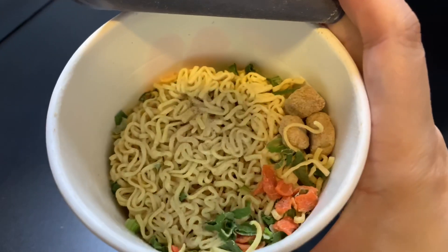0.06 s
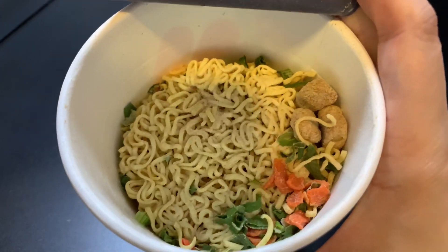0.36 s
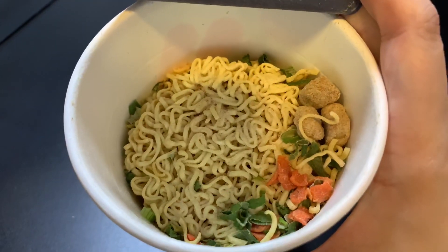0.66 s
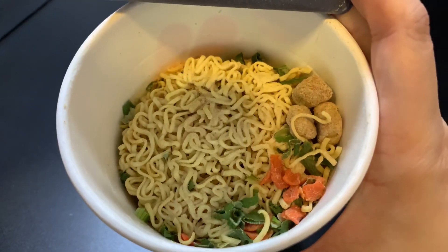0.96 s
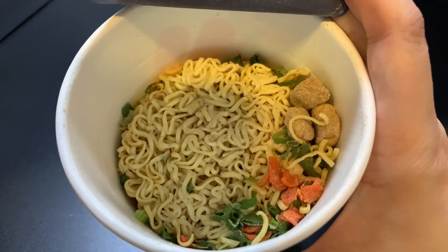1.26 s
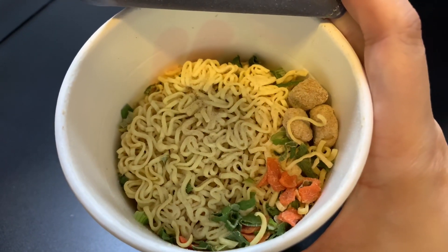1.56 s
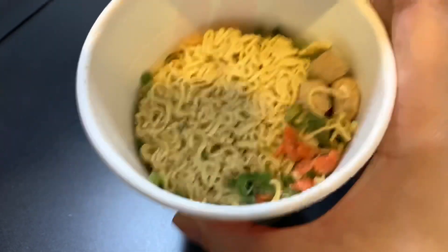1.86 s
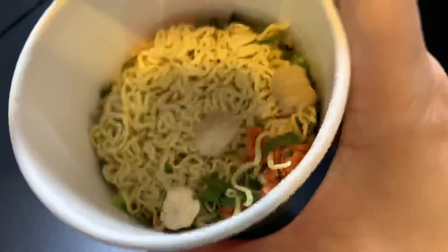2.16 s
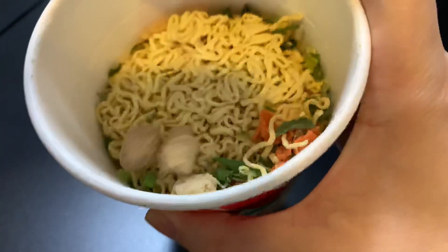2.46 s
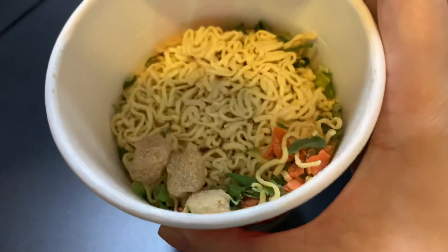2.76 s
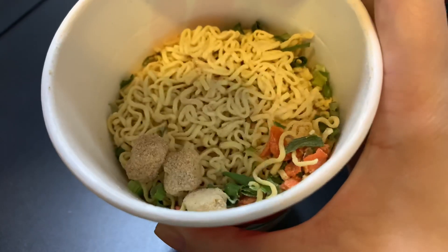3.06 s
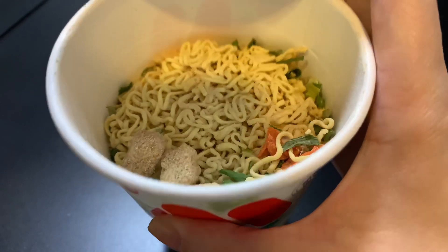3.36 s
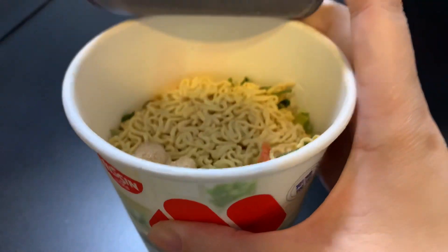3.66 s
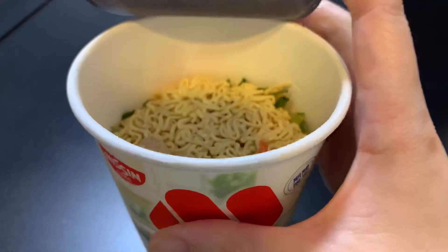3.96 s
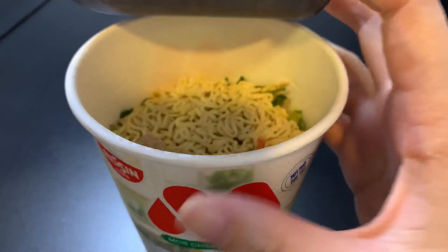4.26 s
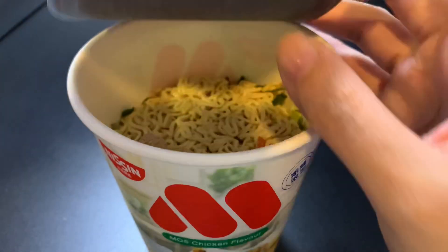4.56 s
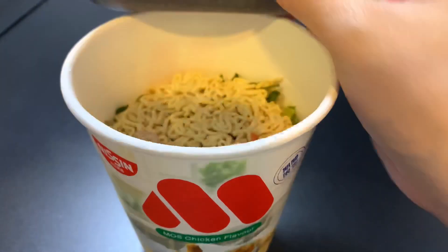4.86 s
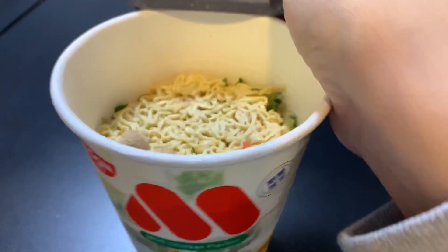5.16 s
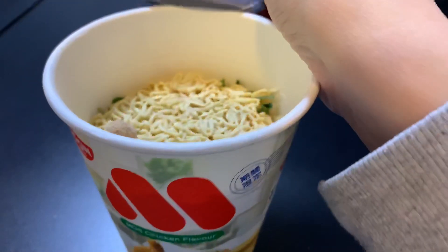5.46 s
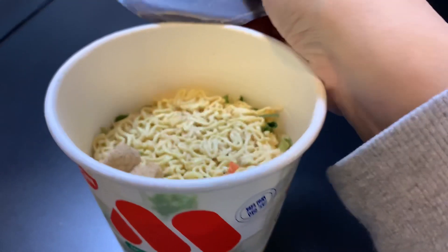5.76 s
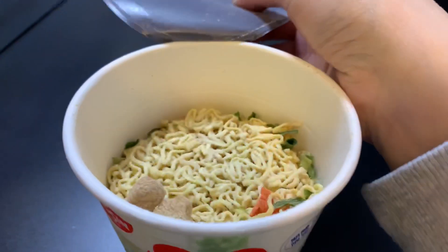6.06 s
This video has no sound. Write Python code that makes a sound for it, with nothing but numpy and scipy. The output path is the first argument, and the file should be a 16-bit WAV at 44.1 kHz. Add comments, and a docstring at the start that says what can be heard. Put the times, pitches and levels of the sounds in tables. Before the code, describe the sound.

Over a faint, low ventilation rumble in a small room, dry noodle pieces briefly crunch and patter inside a shaken paper cup, close to the microphone. Two hollow thumps follow about a second apart as the cup meets a table, with soft fingertip bumps and skin brushing the paper around them. Finally fingers bend back the foil lid, giving a light hiss, a sharp crack and then a quieter, duller snap.

```python
"""A small quiet room, close to a paper cup of dry instant noodles being handled.
One shake sends the pieces sliding and tumbling: they crunch along the paper and ring the hollow cup.
The cup thumps down on the table and is knocked again as the grip changes. Skin sticks and slips
on the paper, then fingers bend back the foil lid, which buckles in two snaps, one bright, one dull.
A low ventilation rumble lies underneath."""
import sys
import numpy as np
from scipy import signal
from scipy.fft import rfft, irfft, next_fast_len
from scipy.io import wavfile

SR = 44100
rng = np.random.default_rng(int(sys.argv[2]) if len(sys.argv) > 2 else 0)


def bounce(signal):
    """Save signal as a 16-bit WAV file at the path given by the first command-line argument."""
    frames = np.transpose(np.atleast_2d(signal))
    limited = np.clip(frames, -1, 1)
    pcm = np.round(limited * 32767).astype(np.int16)
    wavfile.write(sys.argv[1], SR, pcm)


N = 273861
TIME = np.arange(N) / SR
HIT_TIME = TIME[:SR // 3]

# Cues. Their levels are fader settings, ahead of each layer's trim and filters.
# loose pieces sliding: full_at_s, hold_s, level_db, fade_db_per_s
NOODLE_SLIDES = [(1.743, 0.0048, -52.5, 447), (1.811, 0.045, -69, 402), (1.863, 0.026, -51, 502),
                 (1.919, 0.051, -43, 230), (1.964, 0.014, -52.5, 900), (2.018, 0.029, -57, 100),
                 (2.205, 0.07, -64.5, 87), (2.261, 0.056, -65.5, 400)]
# big pieces dropping on the noodle block: start_s, level_db, pitch_hz, brightness_hz
PIECE_DROPS = [(1.741, -38, 691, 1490), (1.868, -32, 590, 900), (1.884, -30.5, 620, 900),
               (1.916, -38, 634, 1500), (1.933, -33, 535, 800), (1.965, -30.5, 610, 1200),
               (2.032, -36, 580, 1300), (2.044, -39.5, 600, 1200), (2.056, -38, 590, 704),
               (2.131, -43, 503, 706), (2.163, -42, 583, 890), (2.235, -38.5, 620, 700),
               (2.248, -44.5, 644, 1500), (2.26, -39.5, 600, 2500), (2.301, -52, 590, 700),
               (2.329, -44.5, 584, 900), (2.366, -57, 600, 900), (2.421, -54, 600, 2500),
               (2.472, -53, 610, 600)]
# sharp contacts on the wall and rim: start_s, click_db, wall_ring_db, click_t60_s
WALL_TICKS = [(1.745, -62, -45, 0.02), (1.849, -56, -53, 0.018), (1.9206, -46, -40.5, .02),
              (1.9666, -38.5, -40, 0.038), (2.095, -37.5, -70, 0.014), (2.126, -38.5, -49.5, 0.02),
              (2.159, -53, -63, .03), (2.1787, -38.5, -38.5, 0.01), (2.21, -60, -60, .012),
              (2.238, -62, -48, 0.012), (2.2584, -62, -47.5, .01), (2.285, -43, -58, 0.027),
              (2.2925, -42, -70, 0.016), (2.303, -51, -60, .025), (2.3223, -38, -45, 0.0099),
              (2.33, -39, -43.5, 0.012), (2.36, -44, -60, 0.012), (2.3635, -40, -56, 0.022),
              (2.386, -57, -68, 0.011), (2.4218, -61, -58, 0.0092), (2.4433, -57.5, -70, 0.012),
              (2.4703, -56.5, -70, 0.017), (2.5065, -48, -70, 0.019), (2.543, -63, -73, 0.011),
              (3.6634, -42.5, -43.5, 0.018), (3.766, -61, -79, 0.0086), (3.8131, -45.5, -75, 0.0085),
              (4.514, -38.5, -44.5, 0.014), (4.588, -32.5, -39, 0.011)]
# the base meets the table, then rocks to rest: start_s, level_db, brightness_hz, low_cut_hz
TABLE_KNOCKS = [(3.6619, -23, 840, 70), (3.685, -41, 380, 200), (3.695, -44.5, 280, 90),
                (3.714, -49, 700, 300), (4.587, -20.5, 600, 300), (4.596, -34, 220, 70.4),
                (4.6032, -30.5, 397, 260), (4.618, -41.5, 330, 220), (4.634, -41.5, 350, 240)]
# the foil buckling: start_s, foil_db, brightness_hz, step_gap_s, rim_db
LID_SNAPS = [(5.6364, -13, 10600, 0.0012, -34.5), (6.0938, -38, 2200, 0.002545, -31.5)]
# fingers sliding along the lid: full_at_s, hold_s, level_db
LID_STROKES = [(5.581, 0.073, -56.5), (5.762, 0.14, -58.5), (5.806, 0.066, -68.5), (6.059, 0.018, -69.5),
               (6.179, 0.15, -69)]
# fingertips landing on the cup: start_s, flex_db, pitch_hz, hollow_db
FINGER_BUMPS = [(3.632, -43, 514, -41.5), (3.925, -49, 390, -49.5), (3.96, -46.5, 105.6, -49.5),
                (4.059, -53, 264, -61), (4.097, -46.5, 242, -62), (4.144, -51, 320, -67),
                (4.158, -40, 307, -56), (4.198, -47.5, 356, -61), (4.211, -53, 463, -48.5),
                (4.222, -47, 200, -50), (4.407, -47, 196, -54), (4.519, -39, 302, -38),
                (4.564, -44, 353, -45), (4.668, -29.5, 505, -47), (4.74, -58, 395, -51),
                (4.773, -52, 230, -47.5), (4.783, -53, 303, -46.5), (4.853, -51, 302, -52),
                (4.869, -47.5, 196, -48), (4.996, -38.5, 186, -50.5), (5.072, -52, 118, -63),
                (5.139, -57.5, 383, -50), (5.208, -51, 450, -49.5), (5.219, -52.5, 450, -59)]
# skin brushing paper: full_at_s, hold_s, hiss_db, fizz_db, snatch_factor (higher is more sudden)
FINGER_STROKES = [(3.298, 0.023, -72.5, -70.5, 0.52), (3.484, 0.048, -76.5, -77, 0.92),
                  (3.655, 0.074, -65.5, -67.5, 0.62), (3.813, 0.053, -70.5, -68, 1.4),
                  (4.182, 0.12, -68, -65.5, 1.1), (4.314, 0.028, -58, -49, 1.1),
                  (4.51, 0.12, -58, -60.5, 0.96), (4.768, 0.021, -61.5, -67, 0.71),
                  (4.855, 0.033, -63, -62, 1.2), (4.998, 0.19, -66, -63.5, 1.5),
                  (5.087, 0.049, -69, -60, 1), (5.356, 0.11, -67.5, -72, 0.71)]
# the palm dragging as the grip shifts: full_at_s, hold_s, level_db
PALM_DRAGS = [(3.944, 0.038, -56), (4.052, 0.026, -58.5), (4.14, 0.08, -58.5), (4.426, 0.071, -62),
              (4.7, 0.12, -62), (5.048, 0.26, -66.5)]

# resonances of the cup's parts: pitch_hz, level_db, t60_s
HELD_CUP_MODES = [(430, -6.5, 0.022), (514, 2, 0.024), (600, 1.5, 0.034), (782, -3, 0.034),
                  (836, 3, 0.0097), (1292, -12, 0.049)]
STANDING_CUP_MODES = [(72, -9.5, 0.15), (101, -12, 0.13), (147.5, -3.5, 0.053), (254, -2.5, 0.06),
                      (327, -2.5, 0.046), (425, 2.5, 0.029), (563, 6.5, 0.026), (610, 1.5, 0.023),
                      (740, -15.5, 0.022), (1116, -8.5, 0.03), (1300, -7, 0.02), (1386, -2.5, 0.05)]
WALL_MODES = [(1167, 13.5, 0.008), (1353, -3, 0.022), (1530, 0, 0.015), (2050, -8.5, 0.049),
              (2460, -3.5, 0.013), (3037, -7.5, 0.044)]
LID_MODES = [(173, -15, 0.03), (323, -2, 0.028), (450, -2, 0.015), (620, -11, 0.02), (1030, -1, 0.0094),
             (1410, 5.5, 0.01), (1615, -4.5, 0.014), (1997, -9.5, 0.13), (2169, -9.5, 0.17),
             (2200, -1.5, 0.01), (2870, 4, 0.018), (3690, 8.5, 0.0023), (4570, -27, 0.0056),
             (6000, -3, 0.005)]
RIM_MODES = [(436, -13, 0.04), (600, -17.5, 0.067), (1130, 6.5, 0.022), (1410, -16, 0.02)]

# tone curves of the noise textures and the reverb: frequency_hz, gain_db
CRUNCH_EQ = [(300, 4), (900, -13), (1400, 3), (1900, 1), (2800, -1), (5000, -4.5), (7200, -6), (9000, -6),
             (10600, -9), (11800, -13.5), (13500, -11), (16000, -15)]
TICK_EQ = [(600, -7), (2000, -7.5), (4000, 0), (7000, 3.5), (9500, 2), (12000, -0.5), (14000, -7),
           (16000, -12.5)]
FOIL_CRACK_EQ = [(300, 2.5), (1300, 11), (3000, 3), (6000, 13), (8000, -0.5), (10500, -17), (16000, -3)]
FOIL_RUB_EQ = [(200, 3.5), (1100, -8.5), (2500, -10.5), (3400, -5), (4250, -1), (5300, -2.5), (7000, -4.5),
               (8500, -5.5), (11500, -17.5), (14000, -21), (16000, -31)]
SKIN_HISS_EQ = [(200, 18.5), (600, -5), (1100, 14), (1800, 7.5), (3000, 10.5), (5000, -1.5), (7000, 5.5),
                (10000, -51), (16000, -41)]
SKIN_FIZZ_EQ = [(1000, -18), (5000, -4.5), (7200, -3.5), (8600, -6.5), (10500, -4.5), (11800, -15),
                (13800, -11.5), (16000, -19.5)]
PALM_EQ = [(50, -6), (110, 3), (300, -2), (600, -11), (800, -21), (1300, -20), (3000, -41.5)]
ROOM_TONE_EQ = [(20, -38.5), (42, -16), (63, 5), (85, -1), (115, -14), (175, -7.5), (250, -19.5),
                (400, -30), (1000, -36), (2500, -44), (6500, -53), (9300, -46), (11800, -57.5),
                (14000, -44.5), (16000, -76)]
REVERB_EQ = [(100, 9.5), (300, 5), (550, 2), (850, 1), (1100, -0.5), (1450, 6), (2100, 3.5), (2900, 1.5),
             (5000, 0.5), (9000, -5.5), (15000, -5)]

# the room's decay: frequency_hz, t60_s
REVERB_DECAY = [(100, 0.45), (300, 0.27), (800, 0.35), (2200, 0.27), (6000, 0.33), (14000, 0.15)]
# power scattered by cup, hand and room: frequency_hz, share_fraction
SCATTER_SHARE = [(150, 0.05), (500, 0.06), (1700, 0.44), (2700, 0.67), (5500, 0.74), (7000, 0.01),
                 (10000, 0.04), (12000, 0)]
# the left microphone port's level over the right: frequency_hz, balance_db
LEFT_BALANCE = [(150, 1), (300, 0.5), (550, 4), (1100, 6.5), (2200, 0.5), (5000, -0.5)]
# the left port's phase lead over the right: frequency_hz, lead_rad
LEFT_LEAD = [(0, 0), (500, 1.3), (1000, 0.87), (1600, 3.5), (2800, 7), (4000, 7), (5500, 9.5), (6200, 11),
             (7200, 10), (9200, 5), (10300, 3.5), (11400, 5), (12200, 4.5), (13300, -0.7), (14700, 1.5),
             (15500, -2.5)]


def noodles():
    """Crumbs scrape along the paper in a dense crunch while bigger pieces drop and sound the cup."""
    flow = sum(from_db(db) * swell(s, hold_s, rise_db_per_s=1502, fade_db_per_s=fade)
               for s, hold_s, db, fade in NOODLE_SLIDES)
    crumbs = grains(per_s=7000, spread_db=2.0)
    edges_hz = np.geomspace(700, 16000, 7)   # each crumb sounds in one of six bands
    crunch = sum(band(part, low, high)
                 for part, low, high in zip(deal(crumbs, count=6), edges_hz, edges_hz[1:]))
    crunch = from_db(1.0) * rms_one(colour(crunch, CRUNCH_EQ))
    tunings = np.exp([-0.15, 0, 0.15])   # the cup's note strays with where a crumb lands
    hollow = sum(resonate(part, retuned(HELD_CUP_MODES, ratio))
                 for part, ratio in zip(deal(crumbs, count=3), tunings))
    out = flow * (crunch + from_db(-4) * cut(rms_one(hollow), 340, "high"))
    for s, db, pitch_hz, brightness_hz in PIECE_DROPS:
        add(out, s, from_db(db) * piece_drop(pitch_hz, brightness_hz))
    return out


def piece_drop(pitch_hz, brightness_hz, usual_pitch_hz=590):
    """A piece lands and rings the held cup; a soft landing leaves out the upper modes."""
    note = ring(retuned(HELD_CUP_MODES, pitch_hz / usual_pitch_hz), vary_db=3.5)
    return peak_one(band(note, 300, brightness_hz))


def wall_ticks():
    """Hard pieces and fingernails click on the paper wall, which rings briefly."""
    out = np.zeros(N)
    for s, click_db, wall_db, t60 in WALL_TICKS:
        wall = from_db(wall_db + 9.0) * peak_one(ring(WALL_MODES, vary_db=3))
        click = from_db(click_db + 8.5) * crack(TICK_EQ, t60)
        add(out, s, click + wall)
    return out


def crumb_trickle(start_s=1.8, end_s=3.1, gap_s=0.035, fade_db_per_s=33):
    """Fine crumbs roll to rest after the shake in uneven, ever fainter clicks."""
    out = np.zeros(N)
    times = start_s + gap_s * (np.arange(40) + rng.uniform(0, .7, 40))
    for s in times[times < end_s]:
        db = -49 - fade_db_per_s * (s - start_s) + 2.0 * rng.normal()
        add(out, s, from_db(db) * crack(TICK_EQ, t60=0.0076))
    return out


def table_knocks():
    """Cup and table thump hollowly, then softer contacts follow as the base rocks to rest."""
    out = np.zeros(N)
    for s, db, brightness_hz, low_cut_hz in TABLE_KNOCKS:
        body = cut(ring(STANDING_CUP_MODES, vary_db=2), brightness_hz)
        thump = peak_one(cut(body, low_cut_hz, "high", order=1))
        add(out, s, from_db(db + 2.5) * thump)
    return out


def foil_lid():
    """Foil hisses under the fingers; each snap is two quick cracks that also tug the cup's rim."""
    snaps = np.zeros(N)
    for s, foil_db, brightness_hz, step_gap_s, rim_db in LID_SNAPS:
        for step_s, step_db in ((s, -4), (s + step_gap_s, 0)):
            foil = peak_one(ring(LID_MODES, vary_db=2.5))
            rim = peak_one(ring(RIM_MODES, vary_db=1.5))
            attack = from_db(4.5) * crack(FOIL_CRACK_EQ, t60=0.0077)
            snap = peak_one(cut(foil + attack, brightness_hz, order=4))
            add(snaps, step_s, from_db(foil_db + step_db) * snap + from_db(rim_db + step_db) * rim)
    speed = sum(from_db(db) * stroke(s, hold_s) for s, hold_s, db in LID_STROKES)
    rub = rms_one(colour(grains(per_s=12000, spread_db=1.5), FOIL_RUB_EQ))
    out = snaps + speed * rub
    add(out, 0.0081, from_db(-14) * band(snaps, 1900, 3600))   # the snaps glance off the table
    return out


def finger_bumps():
    """A soft fingertip flexes the wall, pitched by its spot and grip, and the hollow cup answers."""
    out = np.zeros(N)
    for s, flex_db, hz, hollow_db in FINGER_BUMPS:
        flex_modes = [(hz, 0, 11 / hz), (hz * 1.237, -5, 8 / hz)]   # gone within a few cycles
        flex = peak_one(ring(flex_modes, vary_db=1.5))
        pad_noise = band(rng.standard_normal(len(HIT_TIME)), 0.12 * hz, 0.69 * hz)
        pad = from_db(-7.5) * peak_one(pad_noise * decay(t60=0.054))
        touch = peak_one(cut(flex + pad, 1030, order=4))   # flesh passes no treble
        hollow = peak_one(band(ring(STANDING_CUP_MODES, vary_db=5), 270, 800))
        add(out, s, from_db(flex_db) * touch + from_db(hollow_db) * hollow)
    return out


def finger_brushes():
    """Skin catches and slips on the paper: swells of hiss and fizz over a murmur of the cup."""
    hiss_gain = from_db(-71.5) * stroke(4.49, hold_s=1.17)   # the hand never rests quite still
    fizz_gain = 0
    for s, hold_s, hiss_db, fizz_db, snatch in FINGER_STROKES:
        speed = stroke(s, hold_s, snatch)
        hiss_gain = np.maximum(hiss_gain, from_db(hiss_db) * speed)
        fizz_gain = np.maximum(fizz_gain, from_db(fizz_db) * speed)
    slips = grains(per_s=9000, spread_db=1.0)
    hiss = rms_one(colour(slips, SKIN_HISS_EQ))
    murmur = from_db(-21.5) * resonate(slips, STANDING_CUP_MODES)
    fizz = rms_one(colour(grains(per_s=6000, spread_db=1.5), SKIN_FIZZ_EQ))
    return from_db(4.0) * hiss_gain * (hiss + murmur) + from_db(3.0) * fizz_gain * fizz


def palm_rub():
    """Soft skin sticks and slips on the wall: a dull, uneven rub."""
    speed = sum(from_db(db) * stroke(s, hold_s) for s, hold_s, db in PALM_DRAGS)
    return speed * rms_one(colour(grains(per_s=900, spread_db=2.0), PALM_EQ))


def room_reverb(x, wet_db, predelay_s):
    """Reflections arrive after a short gap and die away, each octave at its own rate."""
    noise = colour(rng.standard_normal(len(HIT_TIME)), REVERB_EQ)
    tail = sum(band(noise, low, 2 * low) * decay(at_hz(REVERB_DECAY, low * np.sqrt(2)))
               for low in 45 * 2. ** np.arange(10))
    since_s = HIT_TIME - predelay_s
    early_lift = 1 + 2.25 * np.exp(-np.abs(since_s) / 0.0089)   # near surfaces answer first
    tail = tail * (since_s > 0) * early_lift
    return from_db(wet_db) * signal.fftconvolve(x, tail / np.sqrt(np.sum(tail ** 2)))[:N]


def room_tone(crossover_hz=610):
    """Ventilation rumble under a faint hiss, from all sides: centred in the bass, wide in the treble."""
    shared, sides = rng.standard_normal(N), rng.standard_normal((2, N))
    bass = cut(shared, crossover_hz, order=1)
    treble = cut(sides, crossover_hz, "high", order=1)
    air = bass + treble + from_db(-10.0) * sides
    return from_db(-59.0) * rms_one(colour(air, ROOM_TONE_EQ))


def mic_ports(x):
    """Two microphone ports hear the same sound, each with its own level and phase."""
    size = next_fast_len(N + SR // 10)
    hz = np.fft.rfftfreq(size, 1 / SR)
    lead_rad = np.interp(hz, *np.transpose(LEFT_LEAD))
    lean = from_db(at_hz(LEFT_BALANCE, hz) / 2) * np.exp(.5j * lead_rad)
    return irfft(rfft(x, size) * np.array([lean, 1 / lean]), size)[:, :N]


def scatter(x, t60, wander_hz):
    """Some sound goes straight to the ports; the rest blurs over short, unsteady stray paths."""
    hz, share = np.transpose(SCATTER_SHARE)
    share = np.clip(share, .001, .95)
    direct = colour(x, np.c_[hz, 10 * np.log10(1 - share)])
    stray = colour(x, np.c_[hz, 10 * np.log10(share)])
    size = next_fast_len(N + SR // 10)
    paths = rfft(rng.standard_normal((2, len(HIT_TIME))) * decay(t60), size)
    stray = irfft(rfft(stray, size) * paths / np.abs(paths), size)   # smears phase, keeps the tone
    wander_rad = np.cumsum(rng.standard_normal((2, N)), axis=1) * np.sqrt(2 * np.pi * wander_hz / SR)
    wobble = np.exp(1j * cut(wander_rad, 2 * wander_hz))
    return mic_ports(direct) + np.real(signal.hilbert(stray)[:, :N] * wobble)


def ring(modes, vary_db):
    """One blow: damped sines of alternating polarity, each at a slightly random strength."""
    return sum((-1) ** k * from_db(db + vary_db * rng.normal()) * decay(t60)
               * np.sin(2 * np.pi * hz * HIT_TIME) for k, (hz, db, t60) in enumerate(modes))


def resonate(clicks, modes):
    """Clicks set a body ringing; rms 1."""
    return rms_one(signal.fftconvolve(clicks, ring(modes, vary_db=4.5))[:N])


def retuned(modes, ratio):
    """The same body ringing higher or lower."""
    return [(hz * ratio, db, t60) for hz, db, t60 in modes]


def crack(spectrum, t60):
    """A burst of tiny slips that dies within milliseconds."""
    return peak_one(colour(rng.standard_normal(len(HIT_TIME)), spectrum) * decay(t60))


def grains(per_s, spread_db):
    """Random clicks of uneven size; sticking and slipping bunches them into spurts."""
    sizes = from_db(spread_db * np.minimum(rng.exponential(1, N), 4)) * rng.choice([-1, 1], N)
    turns_s = np.arange(0, TIME[-1], .008)
    spurts = from_db(1.36 * spread_db * np.interp(TIME, turns_s, rng.standard_normal(len(turns_s))))
    return spurts * sizes * (rng.random(N) < per_s / SR)


def deal(clicks, count):
    """Share clicks out at random among several tracks."""
    dealt = rng.integers(0, count, N)
    return [clicks * (dealt == k) + 1e-18 for k in range(count)]


def stroke(s, hold_s, snatch=1, typical_s=0.092):
    """The speed of a finger that starts, slides and stops; a shorter stroke is more abrupt."""
    haste = snatch * typical_s / hold_s
    return swell(s, hold_s, rise_db_per_s=402 * haste, fade_db_per_s=271 * haste)


def swell(s, hold_s, rise_db_per_s, fade_db_per_s):
    """Rise to full level at time s, hold, die away."""
    before_s, after_s = np.maximum(s - TIME, 0), np.maximum(TIME - s - hold_s, 0)
    return from_db(-rise_db_per_s * before_s - fade_db_per_s * after_s) + 1e-12


def decay(t60):
    """A hit's envelope, down 60 dB after t60 seconds."""
    return from_db(-60 * HIT_TIME / t60)


def colour(x, spectrum):
    """Shape a signal with a smooth tone curve."""
    n = x.shape[-1]
    size = next_fast_len(n)
    gain = from_db(at_hz(spectrum, np.fft.rfftfreq(size, 1 / SR)))
    return irfft(rfft(x, size) * gain, size)[..., :n]


def at_hz(points, hz):
    """Read a curve on a log-frequency axis."""
    points_hz, values = np.transpose(points)
    return np.interp(np.log(hz + 1), np.log(points_hz), values)


def cut(x, hz, kind="low", order=2):
    """Butterworth low- or high-pass."""
    return signal.sosfilt(signal.butter(order, np.clip(hz, 10, SR * 4 / 9), kind, fs=SR, output="sos"), x)


def band(x, low_hz, high_hz):
    """Roll off both bass and treble."""
    return cut(cut(x, low_hz, "high"), high_hz)


def add(track, s, sound):
    """Mix a sound in at time s."""
    i = int(s * SR)
    track[i:i + len(sound)] += sound[:N - i]


def from_db(db):
    """Decibels to gain."""
    return 10 ** (np.asarray(db) / 20)


def rms_one(x):
    """Scale to rms 1."""
    return x / np.sqrt(np.mean(x ** 2) + 1e-20)


def peak_one(x):
    """Scale to peak 1."""
    return x / np.abs(x).max()


def scene():
    """Blows reach the microphone directly; the cup's rustle and the reverb are partly scattered."""
    rustle = noodles() + finger_brushes() + palm_rub() + wall_ticks() + crumb_trickle()
    rustle = cut(rustle, 47, "high")   # the rustle carries no deep bass
    blows = cut(table_knocks() + foil_lid() + finger_bumps(), 51, "high")
    reverb = room_reverb(rustle + blows, wet_db=-10.5, predelay_s=.007)
    return mic_ports(blows) + scatter(rustle + reverb, t60=0.0089, wander_hz=118.9) + room_tone()


def record(dry):
    """A steep low-pass takes off the very top."""
    return signal.sosfilt(signal.ellip(10, .1, 80, 15900, fs=SR, output="sos"), dry)


dry = scene()
out = record(dry)
bounce(out)
```